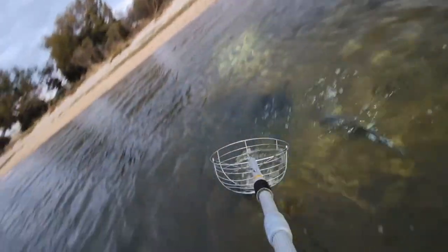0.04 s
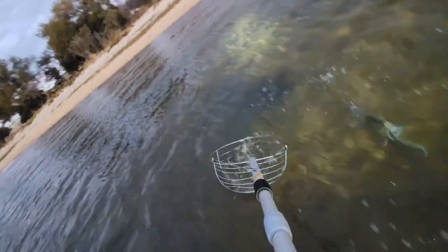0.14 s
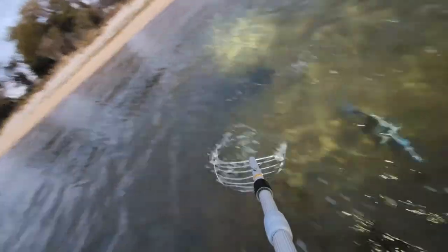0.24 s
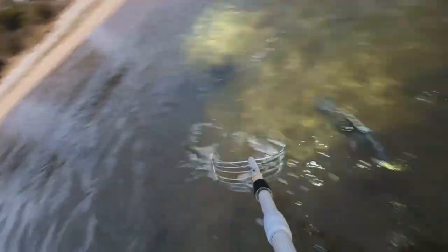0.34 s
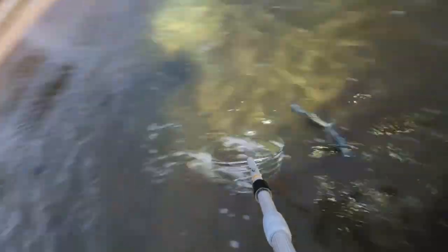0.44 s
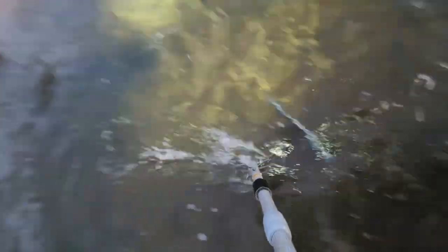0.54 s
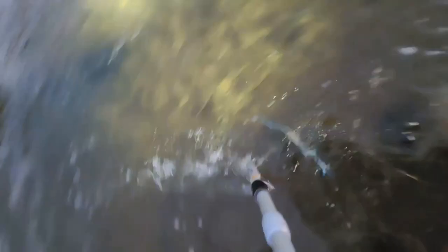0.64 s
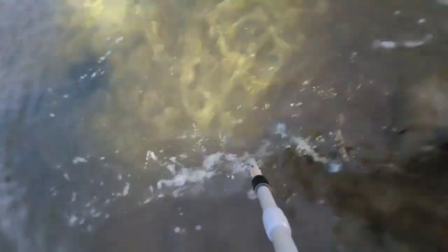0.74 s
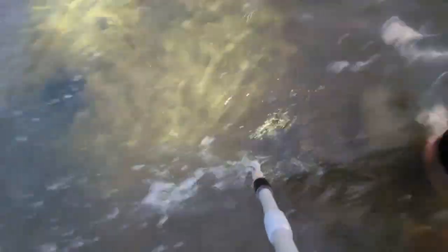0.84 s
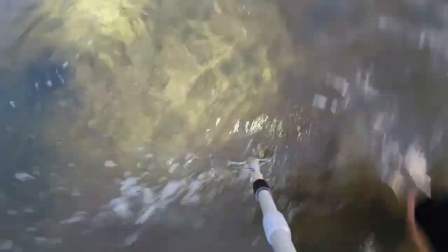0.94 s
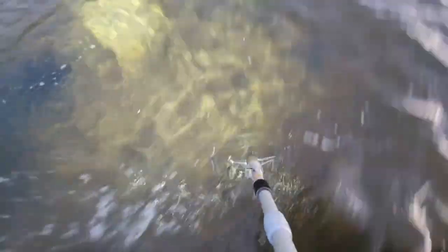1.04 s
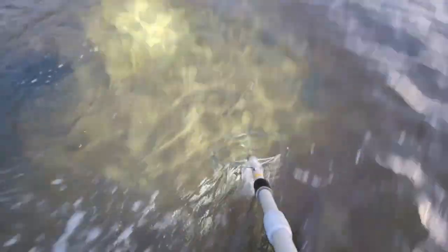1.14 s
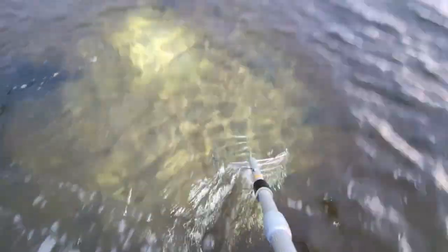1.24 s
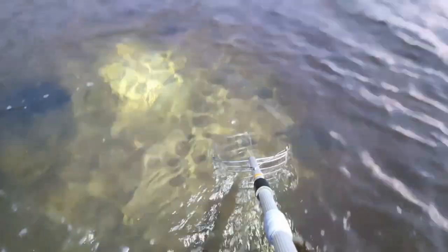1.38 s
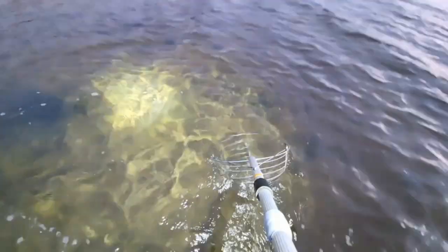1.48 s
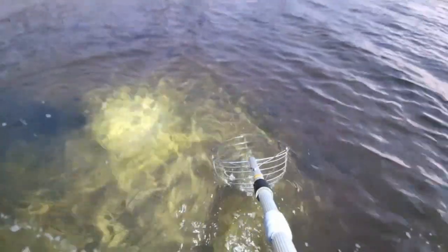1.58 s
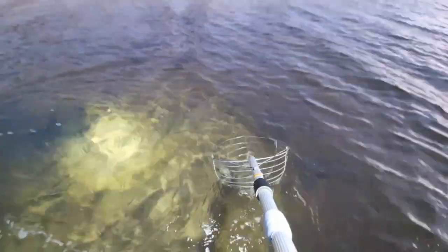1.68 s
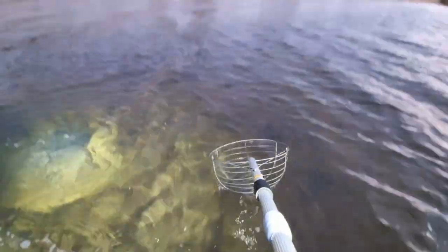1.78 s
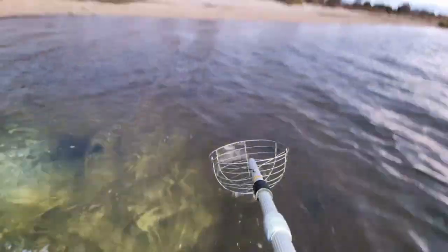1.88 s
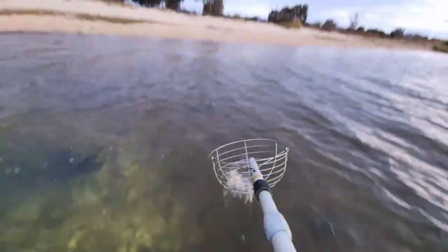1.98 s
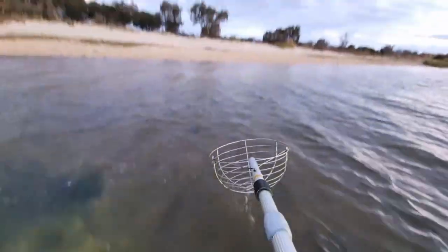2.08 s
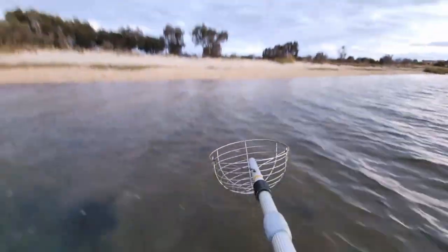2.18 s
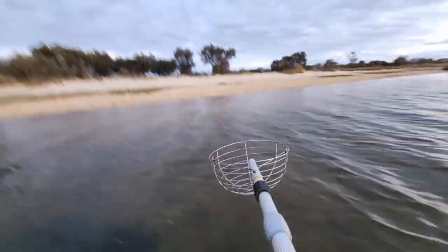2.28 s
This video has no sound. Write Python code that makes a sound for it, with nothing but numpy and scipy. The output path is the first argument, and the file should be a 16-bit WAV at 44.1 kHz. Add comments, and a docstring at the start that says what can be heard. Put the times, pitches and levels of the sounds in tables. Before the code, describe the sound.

Water splashes and gurgles as a wire basket jabs through shallows, briefly scraping grit amid buffeting wind

```python
"""A splash opens the scene: a wire scoop on a pole is jabbed through shallow water, stroke after stroke.
Each stroke is a swarm of tiny ringing bubbles over a noise wash, with crackling spray; larger bubbles
ring singly and drops tick on the surface. Partway through, the basket scrapes the gritty bottom: impulse
trains rasp and drive the resonant modes of its wires. Wind, made of lumpy filtered noise and short
low-pitched pops, rumbles on both microphone ports over a faint hiss. Open flat, no echo."""
import sys
import numpy as np
from scipy import signal
from scipy.fft import rfft, irfft, next_fast_len
from scipy.io import wavfile
from scipy.ndimage import map_coordinates

SR = 44100
rng = np.random.default_rng(int(sys.argv[2]) if len(sys.argv) > 2 else 0)


def transcribe(u):
    """Save the signal u as a 16-bit wav file named by the first command-line argument.

    u: samples, shape (n,) or (channels, n), limited to [-1, 1]; the rate is SR.
    q: integer samples, one column per channel.
    """
    v = np.clip(np.atleast_2d(u).T, -1, 1)
    q = np.round(v * 32767).astype(np.int16)
    wavfile.write(sys.argv[1], SR, q)


N = 101430  # length [samples]

# wind rumble and flutter before port mixing and balance: (time [s], level [dB])
RUMBLE_LEVEL = [(0, -55), (.25, -41.5), (.45, -36), (.64, -33.5), (1.4, -35.5), (1.48, -41.5), (1.7, -34.5),
                (2.3, -46.5)]
FLUTTER_LEVEL = [(0, -60), (.25, -46), (.5, -38.5), (.59, -29), (.67, -31.5), (.83, -33), (.852, -21.5),
                 (.92, -35.5), (1.02, -24.5), (1.08, -33), (1.16, -25), (1.23, -35), (1.36, -32.5),
                 (1.65, -40.5), (2, -39), (2.3, -59)]
# wind colours: (frequency [Hz], relative level [dB])
RUMBLE_SPECTRUM = [(20, -13.5), (60, 2), (90, -3), (135, 0), (400, -42.5)]
FLUTTER_SPECTRUM = [(70, -37), (160, -5.5), (320, -3.5), (430, -14), (650, -23.5), (3000, -63)]
# eddies popping on a port: (time [s], level before panning [dB], pitch [Hz], decay each side [s],
# left over right [dB])
POPS = [(0.632, -18.5, 81, 0.0028, 10), (0.6457, -21, 404, 0.00054, -19.5), (0.658, -27, 334, 0.0012, -17),
        (0.713, -24, 273, 0.0038, -17), (0.7323, -11, 303, 0.0033, -3), (0.8638, -16.5, 380, 0.0019, -2),
        (1.36, -28.5, 325, 0.004, -1), (1.578, -24.5, 187, 0.0047, -2), (1.996, -26, 287, 0.0037, 1)]
POP_BURST_DB = -7  # rough puff under each pop's tone
WIND_BALANCE_DB = 3  # left over right
PORT_OPPOSITION = 0.2  # share of the other port's flutter that is subtracted
# background hiss: (frequency [Hz], relative level [dB])
HISS_SPECTRUM = [(100, 8), (1000, 7), (4000, -3), (14000, 0.5)]
# likeness of the two ports: (frequency [Hz], correlation [0-1])
PORT_LIKENESS = [(600, 0.35), (3500, 0.49), (7000, 0.12), (14000, 0.025)]

# basket catching on the bottom: (time [s], hold [s], push level [dB], tilt [dB per octave])
SCRAPES = [(0.842, 0.027, -37, -8.5), (0.905, 0.048, -37.5, -5), (0.945, 0.012, -27.5, -3),
           (0.984, 0.016, -25, 0.5), (1.01, 0.0064, -40.5, 5), (1.028, 0.0071, -30, -1)]
SCRAPE_RISE_S, SCRAPE_RELEASE_S = 0.0011, 0.019
# resonant modes of the wire basket: (frequency [Hz], relative level [dB])
WIRE_MODES = [(1513, -44), (2842, -47), (2995, -47), (3235, -47), (3467, -48), (3658, -47), (3774, -47),
              (3930, -43), (4393, -50), (5535, -44), (5900, -51), (8355, -55)]
WIRE_DB = -2.5  # ring relative to the rms of the pushes
WIRE_T60_S = 0.075
WIRE_FLEX = 0.0029  # share by which a wire's pitch wavers as it bends
# colour of the grit: (frequency [Hz], relative level [dB])
GRIT_SPECTRUM = [(300, -9), (1000, -7.5), (2700, 3.5), (3800, 4.5), (4300, 3), (6000, 4), (6800, -8.5),
                 (8300, -10), (12000, -13)]

# drops slapping the surface: (time [s], level before a 16.5 dB cut [dB], centre [Hz])
DROPS = [(0.097, -15, 6600), (0.1323, -11.5, 3100), (0.2426, -19, 3550), (0.6027, -19.5, 8100),
         (1.3122, -22, 8850), (1.2584, -14, 6400), (1.325, -17.5, 3860), (1.976, -16, 2330),
         (1.994, -17.5, 5400)]
DROP_T60_S = 0.014
# single bubbles: (time [s], starting pitch [Hz], level before swelling and decay [dB], t60 [s],
# starting glide [octaves per s])
BUBBLES = [(.125, 332, -37, 0.51, 1.5), (.166, 777, -17.5, 0.023, 31), (0.1747, 3010, -1, 0.0033, -1),
           (.330, 2070, -29, 0.024, -1), (0.345, 1210, -14, 0.0046, -11), (.526, 2270, -23.5, 0.015, -7),
           (0.556, 173.8, -23, 0.27, 0.5), (.573, 680, -11, 0.016, 26), (0.6129, 1040, -15, 0.014, 0),
           (1.150, 601, -28.5, 0.13, 7), (1.170, 3180, -26.5, 0.015, -1), (1.173, 815, -31.5, 0.083, 8),
           (1.257, 760, -32, 0.068, 82.5), (1.293, 886, -34, 0.041, 49), (1.531, 1600, -24.5, 0.012, 37),
           (1.547, 1154, -32.5, 0.049, 14), (1.608, 643, -25.5, 0.14, -0.5), (1.673, 498, -22.5, 0.068, 8),
           (1.7335, 1540, -14.5, 0.014, -100), (1.7658, 1146, -18, 0.016, -56),
           (1.770, 3400, -27.5, 0.025, 1.5), (1.815, 352, -28.5, 0.19, -0.5),
           (1.897, 2144, -30, 0.037, -3.5), (2.008, 600, -34.5, 0.19, -0.5), (2.177, 2550, -35.5, 0.02, 56),
           (2.26, 863, -48, 0.14, 14)]
BUBBLE_RISE_S = 0.00055
BRIEF_T60_S = 0.04  # bubbles that outlast this are jostled
LAG_S, LAG_SPREAD_S = 0.00006, 0.00017  # mean delay of the left port behind the right, and its scatter

# strokes through the water: (time [s], hold [s], rise [s], churn level [dB],
# spray level before sputter [dB])
STROKES = [(0.104, 0.1, 0.015, -33.5, -42), (0.38, 0.031, 0.044, -41.5, -48.5),
           (0.498, 0.04, 0.061, -40.5, -50), (0.543, 0.12, 0.023, -37, -45),
           (0.838, 0.21, 0.0026, -35, -48.5), (1.154, 0.018, 0.1, -59, -47), (1.246, 0.13, 0.017, -46, -73),
           (1.609, 0.11, 0.026, -40.5, -56), (1.672, 0.12, 0.013, -35.5, -57),
           (1.984, 0.02, 0.078, -42.5, -47), (2.18, 0.0051, 0.0032, -46, -80)]
STROKE_RELEASE_S = 0.022
LAPPING_DB, FIZZ_DB = -53, -55.5  # water and (before sputter) fizz between strokes
# colours of the water: (frequency [Hz], relative level [dB])
CHURN_SPECTRUM = [(120, -55), (260, 1.5), (380, 4.5), (750, 0.5), (1300, -2), (2200, -8), (3300, -12),
                  (5000, -21), (9000, -51)]
SPRAY_SPECTRUM = [(1000, -5), (2500, -4), (4500, -10.5), (7000, -11), (10000, -17.5), (13000, -12),
                  (16000, -26)]
# uneven surging of water and grit, and the time shift that jostles a ringing bubble
SPUTTER_DB, SPUTTERS_PER_S, JOSTLE_S = 3.6, 100, 0.00028

TOP_HZ = 15900  # upper band limit


def amp(db):
    """Decibels to gain."""
    return 10 ** (np.asarray(db) / 20)


def unit(x):
    """Scale to rms 1."""
    return x / np.sqrt(np.mean(x ** 2) + 1e-20)


def filtered(x, response):
    """Shape x by a gain curve over frequency."""
    size = next_fast_len(N + 8192)
    gain = response(np.fft.rfftfreq(size, 1 / SR))
    return irfft(rfft(x, size) * gain, size)[..., :N]


def over_log_hz(hz, knots_hz, values):
    """Read a curve between its knots, on a log frequency axis."""
    return np.interp(np.log(hz + 1), np.log(knots_hz), values)


def coloured(x, spectrum):
    """Colour x by a spectrum table, at rms 1."""
    knots_hz, db = np.transpose(spectrum)
    return unit(filtered(x, lambda hz: amp(over_log_hz(hz, knots_hz, db))))


def wobble(rate):
    """Smooth random curve with rate knots a second."""
    knots = rng.standard_normal(int(N * rate / SR) + 4)
    return map_coordinates(knots, [np.arange(N) * rate / SR])


def sputter():
    """Random surging gain of moving water."""
    return amp(SPUTTER_DB * wobble(SPUTTERS_PER_S))


def noise():
    """White noise, unrelated at the two ports."""
    return rng.standard_normal((2, N))


def pair(x):
    """Mix two unrelated signals to left and right: partly alike in the mids, unrelated in the treble."""
    knots_hz, alike = np.transpose(PORT_LIKENESS)

    def mid_side_gains(hz):
        turn = np.arccos(np.clip(over_log_hz(hz, knots_hz, alike), -1, 1)) / 2
        return np.array([np.cos(turn), np.sin(turn)])

    mid, side = filtered(x, mid_side_gains)
    return np.array([mid + side, mid - side])


def panned(db):
    """Left and right gains, db apart."""
    return amp(np.array([[db], [-db]]) / 2)


def swell(s, hold, rise, release):
    """Exponential rise up to time s, hold, exponential release."""
    t = np.arange(N) / SR - s
    return np.exp(np.minimum(t, 0) / rise - np.maximum(t - hold, 0) / release)


def ringing(s, hz, gain, t60, glide, lag, rise, size=2000):
    """Damped gliding sines, one per entry, reaching the two ports lag apart."""
    columns = (s, hz, gain, t60, glide, lag, rise)
    s, hz, gain, t60, glide, lag, rise = [np.reshape(v, (-1, 1)) for v in columns]
    at = (s * SR).astype(int) + np.arange(size)
    ports = []
    for side in (0.5, -0.5):
        t = np.maximum(at / SR - s - side * lag, 0)
        tone = np.sin(2 * np.pi * hz * t * (1 + np.log(2) * glide * t / 2))
        envelope = np.exp(-np.log(1000) * t / t60) * (1 - np.exp(-t / rise))
        wave = gain * tone * envelope
        ports.append(np.bincount(np.maximum(at, 0).ravel(), wave.ravel(), N)[:N])
    return np.array(ports)


def swarm(low_hz, high_hz, cycles, scatter_db, chirp, count, size):
    """Random small bubbles of equal mean energy per Hz, from sharp ticks to rising blips, at rms 1."""
    when, pitch, life, strength, place, depth = rng.random((count, 6)).T
    hz = low_hz * (high_hz / low_hz) ** pitch
    lasts = 2 / 20 ** life
    t60 = cycles * lasts / hz
    gain = amp(-scatter_db * np.log(1 - 0.97 * strength)) * hz / np.sqrt(lasts)
    glide = 2 * depth * chirp / t60
    lag = LAG_S + LAG_SPREAD_S * (2 * place - 1)
    return unit(ringing(when * N / SR, hz, gain, t60, glide, lag, 0.5 / hz, size=size))


def grains(scatter_db, count):
    """Two trains of random impulses of scattered size and sign, at rms 1."""
    when, strength, sign = rng.random((count, 2, 3)).T
    gain = amp(-scatter_db * np.log(1 - 0.98 * strength)) * np.sign(sign - 0.5)
    trains = [np.bincount((w * N).astype(int), g, N) for w, g in zip(when, gain)]
    return unit(np.array(trains))


def hiss():
    """Faint steady noise at both ports."""
    return amp(-60.0) * coloured(noise(), HISS_SPECTRUM)


def buffet(level, spectrum, lumpy_db, rate):
    """Turbulence that swells in lumps, differently at each port."""
    lumps = amp(lumpy_db * np.array([wobble(rate), wobble(rate)]))
    fader = amp(np.interp(np.arange(N) / SR, *np.transpose(level)))
    return fader * unit(lumps * coloured(noise(), spectrum))


def pops():
    """Single eddies on a port: a brief low tone with a rough puff of noise."""
    out = np.zeros((2, N))
    for s, db, hz, width, pan_db in POPS:
        t = np.arange(N) / SR - s
        puff = coloured(pair(noise()), [(2 * hz, 0), (10 * hz, -42)])
        body = np.sin(2 * np.pi * hz * t) + amp(POP_BURST_DB) * puff
        out += amp(db) * panned(pan_db) * np.exp(-np.abs(t / width)) * body
    return out


def wind():
    """Turbulence at the ports: a deep rumble, a higher flutter and popping eddies."""
    rumble = buffet(RUMBLE_LEVEL, RUMBLE_SPECTRUM, lumpy_db=3, rate=21)
    flutter = buffet(FLUTTER_LEVEL, FLUTTER_SPECTRUM, lumpy_db=3.0, rate=90)
    opposed = flutter - PORT_OPPOSITION * flutter[::-1]
    return panned(WIND_BALANCE_DB) * (rumble + opposed) + pops()


def brightness(tilt, hz):
    """Gain of a catch's spectral tilt, pivoting at 3 kHz."""
    return amp(tilt * np.log2(np.clip(hz, 1000, 8000) / 3000))


def grit_rasp(pushes):
    """Dense impulses of grit along the basket, louder and brighter or duller with each catch."""
    rasp = np.zeros((2, N))
    for push, tilt in pushes:
        grit = coloured(pair(grains(scatter_db=1.0, count=16000)), GRIT_SPECTRUM)
        rasp += push * unit(filtered(grit, lambda hz: brightness(tilt, hz)))
    return amp(SPUTTER_DB / 2 * wobble(2 * SPUTTERS_PER_S)) * rasp


def wire_ring(pushes):
    """Noisy force of the catches excites damped wire modes, whose pitch wavers as the wires bend."""
    t = np.arange(SR // 3) / SR
    ring = np.zeros((2, N))
    for hz, db in WIRE_MODES:
        force = sum(push * brightness(tilt, hz) ** 2 for push, tilt in pushes)
        mode = np.exp(2j * np.pi * hz * t - np.log(1000) * t / WIRE_T60_S)
        driven = signal.fftconvolve(force * noise(), mode[None], axes=1)[:, :N]
        bend = np.exp(2j * np.pi * hz * np.cumsum(WIRE_FLEX * wobble(61.2)) / SR)
        ring += amp(db) * unit((bend * driven).real)
    effort = np.sqrt(np.mean(sum(push for push, _ in pushes) ** 2))
    return amp(WIRE_DB) * unit(pair(ring)) * effort


def scrape():
    """Grit rasps along the basket in a few catches and sets its wires ringing."""
    pushes = []
    for s, hold, db, tilt in SCRAPES:
        push = amp(db) * swell(s, hold, SCRAPE_RISE_S, SCRAPE_RELEASE_S)
        pushes.append((push, tilt))
    return grit_rasp(pushes) + wire_ring(pushes)


def drops():
    """Each drop slaps the surface as a short broad tick of noise around its centre frequency."""
    out = np.zeros((2, N))
    for s, db, centre in DROPS:
        band = lambda hz: 1 / (1 + 6 * np.log((hz + 1) / centre) ** 2)
        tick = unit(filtered(pair(noise()), band))
        out += amp(db - 16.5) * tick * swell(s, 0, 0.00062, DROP_T60_S / np.log(1000))
    return out


def plops():
    """Larger bubbles ring singly and glide; moving water jostles the lasting ones in pitch and strength."""
    s, hz, db, t60, glide = np.transpose(BUBBLES)

    def ring(k):
        return ringing(s[k], hz[k], amp(db[k]), t60[k], glide[k], LAG_S, BUBBLE_RISE_S, size=8000)

    lasting = t60 > BRIEF_T60_S
    at = np.arange(N)
    shaken = at + SR * JOSTLE_S * wobble(SPUTTERS_PER_S)
    gurgle = np.array([np.interp(shaken, at, x) for x in ring(lasting)])
    return ring(~lasting) + sputter() * gurgle


def water_level(column, between_db):
    """Power sum of all the strokes and the stirred water between them."""
    stirred = swell(0.1, 1.255, 0.012, 0.1) + swell(1.633, 0.4, 0.036, 0.3)
    power = (amp(between_db) * stirred) ** 2
    for stroke in STROKES:
        s, hold, rise = stroke[:3]
        power = power + (amp(stroke[column]) * swell(s, hold, rise, STROKE_RELEASE_S)) ** 2
    return np.sqrt(power)


def water():
    """Each stroke churns up a swarm of bubbles over a wash, and throws a sputtering spray."""
    tiny = swarm(307.0, 5620, cycles=45.5, scatter_db=1.5, chirp=0.36, count=2800, size=2600)
    bubbles = coloured(tiny, CHURN_SPECTRUM)
    wash = coloured(pair(noise()), CHURN_SPECTRUM)
    churn = unit(bubbles + amp(-9.5) * sputter() * wash)
    specks = grains(scatter_db=3.5, count=1300) + amp(-1) * noise()
    spray = sputter() * coloured(pair(specks), SPRAY_SPECTRUM)
    return water_level(3, LAPPING_DB) * churn + water_level(4, FIZZ_DB) * spray


def scene():
    """Hiss and wind behind the basket, the drops, the bubbles and the strokes."""
    return hiss() + wind() + scrape() + drops() + plops() + water()


def record(dry):
    """Steep low-pass: the recorder passes next to nothing above its band limit."""
    return filtered(dry, lambda hz: 1 / (1 + (hz / TOP_HZ) ** 120))


dry = scene()
out = record(dry)
transcribe(out)
```